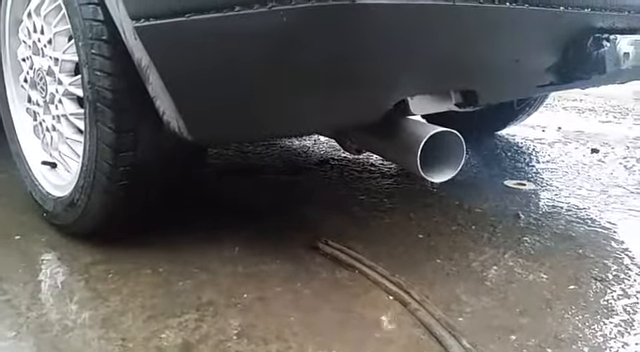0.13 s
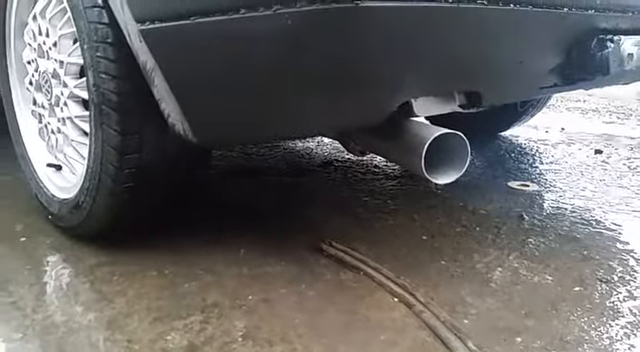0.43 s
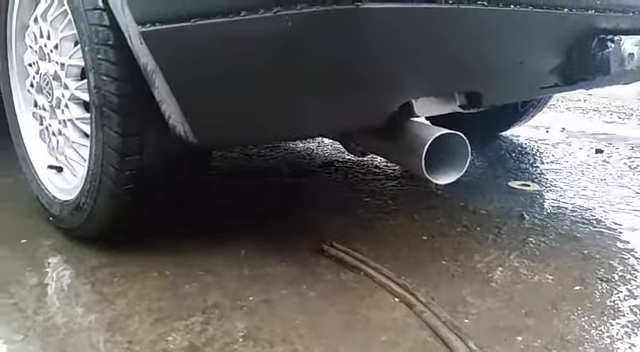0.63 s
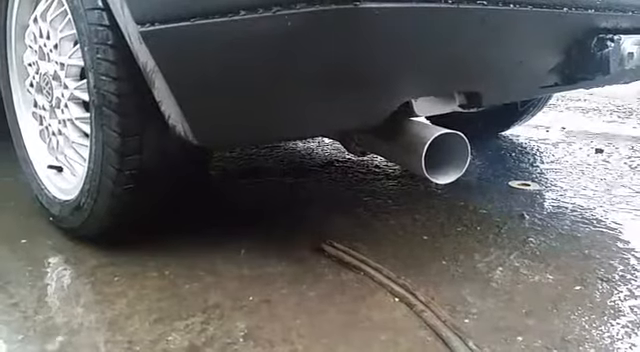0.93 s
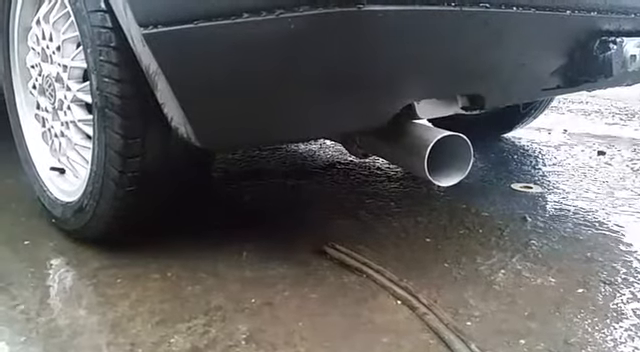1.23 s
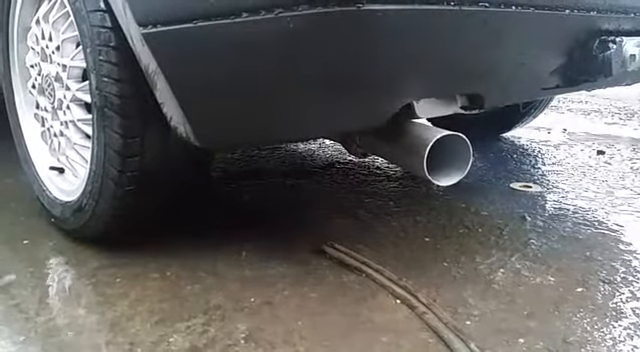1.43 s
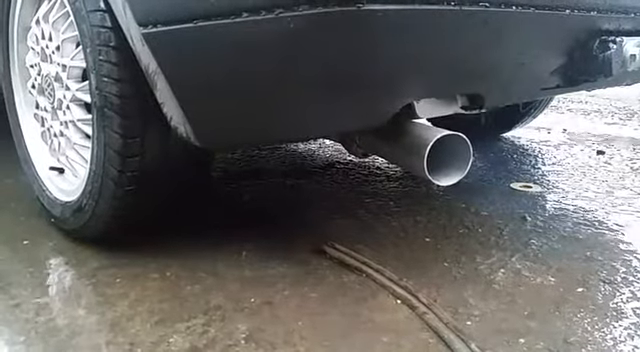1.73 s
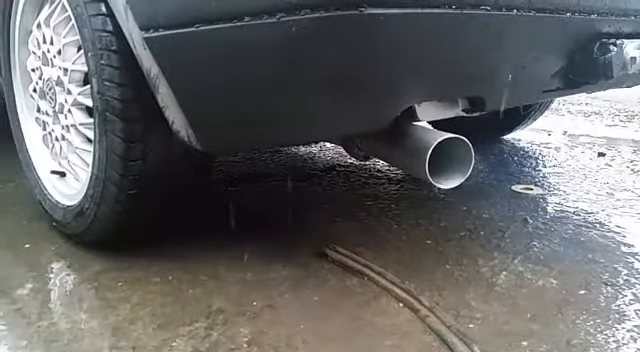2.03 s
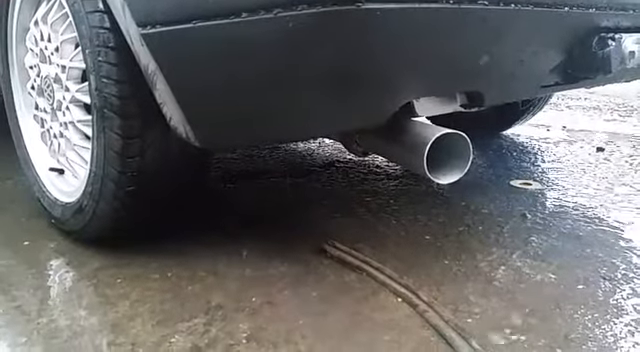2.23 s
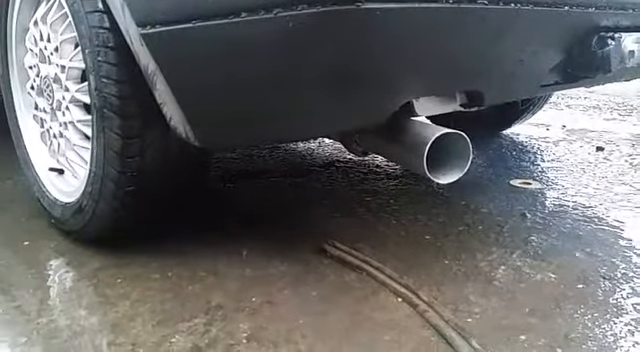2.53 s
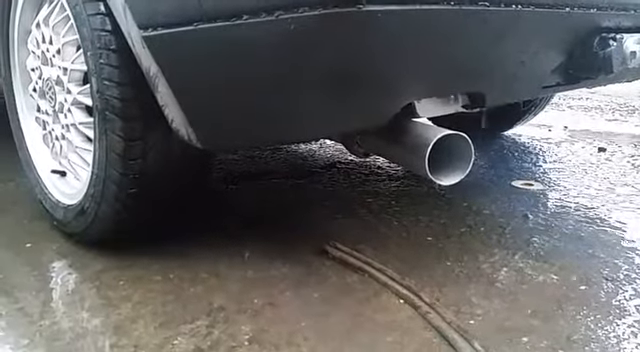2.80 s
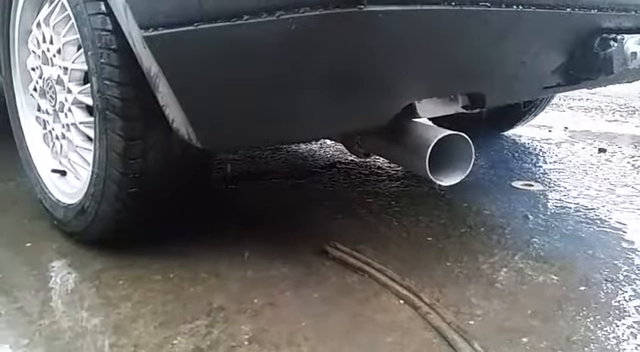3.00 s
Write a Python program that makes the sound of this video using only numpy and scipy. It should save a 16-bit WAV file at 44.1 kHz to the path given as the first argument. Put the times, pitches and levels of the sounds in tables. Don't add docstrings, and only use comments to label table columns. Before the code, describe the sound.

A car engine drops from a rev to a rumbling idle, then revs up again through its exhaust

```python
import sys
import numpy as np
from scipy import signal
from scipy.fft import rfft, irfft, next_fast_len
from scipy.io import wavfile
from scipy.ndimage import uniform_filter1d

SR = 44100
rng = np.random.default_rng(int(sys.argv[2]) if len(sys.argv) > 2 else 0)


def invert_db(level):
    return 10 ** (np.asarray(level, dtype=float) / 20)


def digitize_waveform(pressure):
    field = np.atleast_2d(pressure).T
    bounded = np.clip(field, -1, 1)
    quanta = np.round(bounded * 32767).astype(np.int16)
    wavfile.write(sys.argv[1], SR, quanta)


N = 139356
T = np.arange(N) / SR

# t/s, valve clatter/dB, boom/dB, gas flow/dB,
# uneven firing/dB, mouth ring/dB
ENGINE = [(0.0, 0, -15, -43.5, -41, -42), (0.1, 6.5, -10, -49, -17.5, -52), (0.23, 2, -12.5, -40, -49, -62),
          (0.4, 2.5, -15, -46.5, -27, -61), (0.5, -4, -19, -43, -9, -55), (0.7, 1.5, -15, -45, -16, -46.5),
          (0.99, -2.5, -13.5, -45, -16, -38), (1.25, -4, -12, -42, -15.5, -36),
          (1.59, 1.5, -12.5, -44, -18, -38.5), (1.77, 2, -12, -40.5, -22.5, -39.5),
          (1.99, 6, -10, -39.5, -11, -41.5), (2.15, 2, -13.5, -40, -6, -57),
          (2.34, -1.5, -14.5, -35, -10.5, -43), (2.53, -1, -9, -36, -7, -41.5),
          (2.6, 1, -10, -36, -18, -36.5), (2.67, 3.5, -12, -36, -15, -43.5),
          (2.98, 0, -11, -34.5, -6.5, -35.5), (3.16, -2, -14, -33, -14.5, -36)]
# t/s, firing rate/Hz
SPEED = [(0, 64.3), (.15, 56.9), (.25, 51.2), (.35, 46.5), (.45, 42.1), (.56, 39.8), (.75, 41.8),
         (.95, 43.6), (1.15, 44.2), (1.45, 45), (1.62, 46.9), (1.72, 49.8), (1.85, 56.2), (2, 63.4),
         (2.3, 76.7), (2.6, 89.9), (2.9, 101.7), (3.16, 111.7)]
# f/Hz, width/Hz, level/dB
MOUTH = [(9580, 570, 2.4), (823, 44, 15.2), (1063, 116, 12.3), (1550, 320, 3.9), (1935, 250, 6.2),
         (3365, 415, 7.2), (533, 110, 10.5), (4395, 770, 6.7), (5250, 540, 6), (6110, 170, 5.3),
         (7390, 680, 4.5), (10620, 700, 1.56), (11340, 2400, 2.76), (14400, 1600, 1.1)]
# f/Hz, width/Hz, level/dB
GAPS = [(4050, 250, -6), (4967, 71, -8), (5350, 65, -10), (5770, 97, -0.5), (6220, 210, -10),
        (7310, 150, -5.5), (8600, 210, 0), (10100, 270, -6.5), (11000, 250, -2.5)]


def curve(table, col):
    a = np.array(table, float)
    return np.interp(T, a[:, 0], a[:, col])


def shape(points, hz, bells=()):
    a = np.array(points, float)
    v = np.interp(np.log(hz + 1), np.log(a[:, 0]), a[:, 1])
    return v + sum(db * np.exp(-.5 * (2 * (hz - f) / w) ** 2) for f, w, db in bells)


def colour(x, points, bells=(), causal=True):
    size = next_fast_len(2 * N)
    log_gain = shape(points, np.fft.rfftfreq(size, 1 / SR), bells) * np.log(10) / 20
    c = irfft(log_gain, size)
    if causal:
        c[1:size // 2] *= 2
        c[size // 2 + 1:] = 0
    return irfft(rfft(x, size) * np.exp(rfft(c)), size)[..., :N]


def band(x, order, hz, kind="low"):
    return signal.sosfiltfilt(signal.butter(order, hz, kind, fs=SR, output="sos"), x)


def unit(x):
    return x / np.sqrt(np.mean(x ** 2))


def walk(rate):
    k = int(SR / rate)
    steps = np.repeat(rng.standard_normal(N // k + 1), k)
    return unit(uniform_filter1d(uniform_filter1d(steps, k), k)[:N])


def hum(hz, width_hz):
    slow = signal.lfilter([1], [1, -np.exp(-np.pi * width_hz / SR)], rng.standard_normal((2, N)))
    slow = signal.lfilter([1], [1, -np.exp(-2 * np.pi * width_hz / SR)], slow)
    carrier = np.exp(2j * np.pi * np.cumsum(hz) / SR)
    return unit(np.real((slow[0] + 1j * slow[1]) * carrier))


def puffs(turns, at, width, scatter_db, uneven_db):
    count = np.floor(turns - at + 1)
    scatter = scatter_db * rng.standard_normal(1000)[count.astype(int)]
    size = invert_db(scatter + uneven_db * (count % 2 - 3.5))
    p = (turns - at + 1 - count) / width
    return size * (p * np.exp(1 - p)) ** 2


def boom(turns):
    # multiple of firing rate, level/dB
    orders = [(1, 0.5), (2, 2), (3, 2.5), (4, 1), (5, 3), (6, -4), (7, -6), (8, -15.5), (9, -34), (10, -44)]
    # multiple of firing rate, level/dB
    half_orders = [(.5, -23), (1.5, -2.5), (2.5, -3.5), (3.5, 5), (4.5, 1), (5.5, -2.5), (6.5, -26),
                   (7.5, -37), (8.5, -14)]
    # t/s, extra of the lowest partial/dB, of those above the fourth/dB,
    # of the second/dB, of the third/dB
    throttle = [(0, 9, -9.5, 1, -1.5), (.2, 7, 3, -6.5, 2), (.3, 10, 4, -1, -5.5), (.45, 22, 2.5, 4.5, -3),
                (.6, 20, -0.5, -5, 5.5), (.85, 13, -13, -1, 1), (1.3, 18, 2, 3, 0.5), (1.7, 8.5, 5, 5, 2.5),
                (2.1, 2, 0, 1, -0.5), (2.4, 1, -5.5, -2, 5), (2.7, -1.5, -4, -0.5, -3.5),
                (3.16, 0.5, 7, 5.5, -2)]
    # t/s, lead of the upper partials/turns
    steepening = [(0, -.05), (1.3, .03), (1.55, .1), (1.85, .35), (2.05, .35), (2.2, .15), (2.4, -.2),
                  (2.7, 0), (3.16, .2)]
    # f/Hz, level/dB
    pipe = [(30, -32.5), (60, -7), (100, 1.5), (205, 0.5), (232, -19.5), (300, -14.5), (395, -18),
            (440, -28.5)]
    # f/Hz, width/Hz, level/dB
    pipe_waves = [(102.5, 12.3, 0.5), (157.4, 14.4, -3), (168.2, 7.9, 4), (240, 10, -13), (249.3, 119, 9),
                  (338, 65, -2), (381, 46, 6.5)]

    def extra(k):
        if k < 1.2:
            return invert_db(curve(throttle, 1))
        if k > 4.2 or k == 3.5:
            return invert_db(curve(throttle, 2))
        if k == 2:
            return invert_db(curve(throttle, 3))
        if k == 3:
            return invert_db(curve(throttle, 4))
        return 1

    lean = curve(steepening, 1)
    pulse = 0
    for k, db in orders:
        lead = min(max(k - 2, 0), 2) * lean
        pulse = pulse + invert_db(db) * extra(k) * np.cos(2 * np.pi * (k * turns + lead))
    uneven = 0
    for k, db in half_orders:
        uneven = uneven - invert_db(db) * extra(k) * np.sin(2 * np.pi * k * (turns + 0.25))
    uneven = uneven * invert_db(curve(ENGINE, 4) + 1.34 * walk(6.48))
    out = colour(pulse * invert_db(0.09 * walk(30)) + uneven, pipe, pipe_waves, causal=False)
    out = out - 2 * band(out, 4, 238, "high")
    mic_low_hz, mic_low_q = 45, 1.5
    w = 2 * np.pi * mic_low_hz
    out = signal.lfilter(*signal.bilinear([1, 0, 0], [1, w / mic_low_q, w * w], SR), out)
    steady = np.sqrt(uniform_filter1d(uniform_filter1d(out ** 2, size=4000), size=4000))
    return out / steady * invert_db(curve(ENGINE, 2))


def rumble():
    # f/Hz, level/dB per Hz
    turbulence = [(30, -24.5), (90, -2.5), (200, -5.5), (240, -11.5), (390, -17), (450, -23), (1100, -30.5),
                  (2500, -78)]
    level_db, growth = -27, 0.055
    x = unit(colour(rng.standard_normal((2, N)), turbulence))
    return x * invert_db(level_db + growth * (curve(ENGINE, 3) + 58.5) + 0.5 * walk(8.42))


def gas_gate(turns):
    depth = np.clip(0.6 * 45 / curve(SPEED, 1), 0, 1)
    return 1 - depth + depth * puffs(turns, at=.35, width=.25, scatter_db=1.4, uneven_db=3.5) * 0.41


def hiss(gate):
    # f/Hz, level/dB per Hz
    tearing = [(300, -7.5), (900, -12.5), (1400, -16), (2000, -5.5), (4100, -22), (4800, -2), (9000, -4),
               (15500, -18)]
    level_db, flutter_db = 3, .5
    flow = curve(ENGINE, 3)
    x = unit(colour(rng.standard_normal((2, N)) * gate, tearing, [*MOUTH, *GAPS]))
    low = band(x, 3, 2400)
    top = band(x, 3, 12500, "high")
    upper = band(x, 3, 6300, "high") - top
    middle = x - low - top - upper
    low = low * invert_db(-35.5 + 0.56 * (flow + 48) + flutter_db * walk(11.54))
    upper = upper * invert_db(flow + 0.89 * walk(11))
    middle = middle * invert_db(flow + 1.7 * walk(7.88))
    top = top * invert_db(-3.5 + flow + 0.12 * (flow + 32) + .5 * walk(22))
    return invert_db(level_db) * (low + upper + middle + top)


def whistle(gate):
    # t/s, f/Hz, level/dB, level of its octave/dB
    turbine = [(1.8, 2058, -12, -33), (2.1, 2442, -22, -30), (2.23, 2590, -46, -19.5),
               (2.4, 2952, -44, -19), (2.55, 3285, -31, -26), (2.78, 3918, -28, -21.5),
               (2.94, 4470, -25.5, -40), (3.04, 4720, -12.5, -25), (3.16, 4985, -7.5, -44)]
    hz = curve(turbine, 1)
    ports = []
    for _ in range(2):
        tone = invert_db(curve(turbine, 2)) * hum(hz, width_hz=330)
        octave = invert_db(curve(turbine, 3)) * hum(2 * hz, width_hz=420)
        ports.append(tone + octave)
    sound = colour(np.array(ports) * gate, [(2000, -26.0), (10000, -10)], [*MOUTH, *GAPS])
    return sound * invert_db(1.34 * walk(39.95))


def clatter(turns):
    metal = [(4350, -44.5), (4750, -4), (8000, -10.5), (12500, -17.5), (15500, -39)]  # f/Hz, level/dB
    x = rng.standard_normal((2, N)) * puffs(turns, at=.4, width=.17, scatter_db=1.8, uneven_db=0.67)
    level_db = -49.5 + curve(ENGINE, 1) + 0.82 * (curve(ENGINE, 3) + 47.5)
    return unit(colour(x, metal, [*MOUTH, *GAPS])) * invert_db(level_db + .5 * walk(11.6))


def ring(turns):
    tone = hum(1965 * (1 + 0.00301 * walk(20)), width_hz=5)
    tone = tone / uniform_filter1d(np.abs(tone), size=400) ** 1.04
    swell = 0.017 + puffs(turns, at=.4, width=0.27, scatter_db=0.68, uneven_db=2.9)
    return unit(tone) * swell * invert_db(10 + curve(ENGINE, 5))


def ticks():
    # t/s, level/dB
    clicks = [
        (1.092, -26),
        (1.750, -18),
    ]
    x = np.zeros(N)
    for s, db in clicks:
        fade = np.exp(-np.maximum(T - s, 0) / 0.0002) * (T >= s)
        x += invert_db(db) * fade * np.sin(2 * np.pi * 3000 * (T - s))
    return x


def scene():
    # f/Hz, left minus right/dB
    port_tilt = [(60, -1.5), (200, -2.3), (1300, -3.5), (2400, -1), (4000, -8), (4700, -15), (6500, -5),
                 (15000, 0)]
    # f/Hz, share from 0 to 1
    apart = [(60, .5), (250, .4), (600, .27), (1200, .55), (2000, .3), (4800, .22), (8000, .43),
             (15000, .54)]
    # f/Hz, lag/radians
    lag = [(60, .07), (860, .5), (1400, 1.2), (2100, .5), (5000, 2), (6460, 4.2), (10900, 4.9),
           (13000, 6.4)]
    turns = -.23 + np.cumsum(curve(SPEED, 1) * (1 + 0.0006 * walk(12))) / SR
    gate = gas_gate(turns)
    both, other = rumble() + hiss(gate) + whistle(gate) + clatter(turns)
    hz = np.fft.rfftfreq(N, 1 / SR)
    share = shape(apart, hz)
    tilt = shape(port_tilt, hz) / 2
    mid = rfft(both) * np.sqrt(1 - share ** 2) + rfft(boom(turns) + ring(turns) + ticks())
    side = rfft(other) * share
    left = (mid + side) * invert_db(tilt) * np.exp(-1j * shape(lag, hz))
    right = (mid - side) * invert_db(-tilt)
    return irfft(np.array([left, right]), N)


def band_limit(x):
    return signal.sosfilt(signal.butter(12, 15660, fs=SR, output="sos"), x)


def record(dry):
    rounded = np.tanh(0.73 * dry) / 0.64
    top_cut = signal.ellip(8, .2, 70, 15800, fs=SR, output="sos")
    return band_limit(signal.sosfilt(top_cut, rounded))


dry = scene()
out = record(dry)
digitize_waveform(out)
```